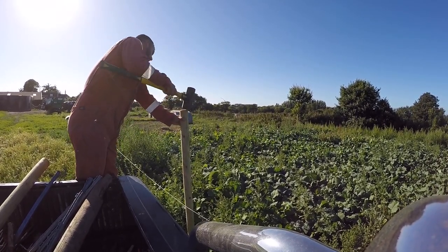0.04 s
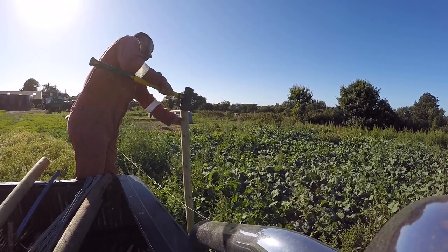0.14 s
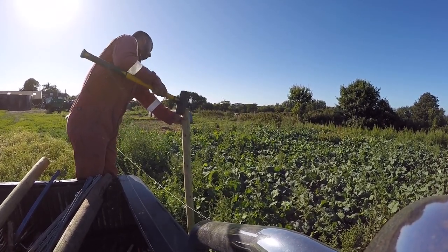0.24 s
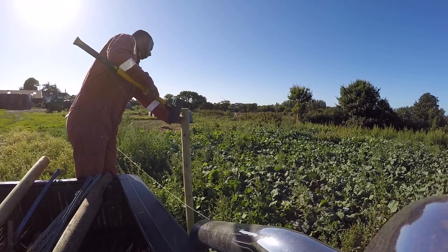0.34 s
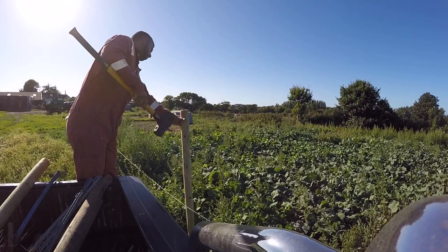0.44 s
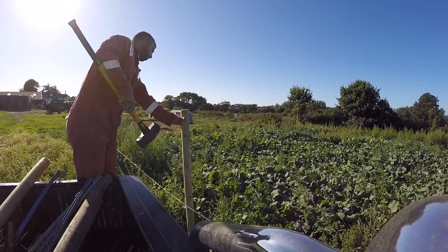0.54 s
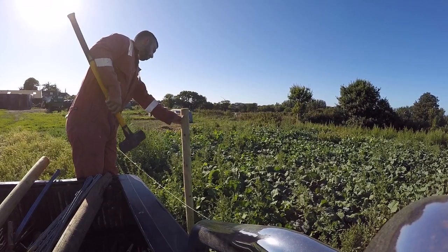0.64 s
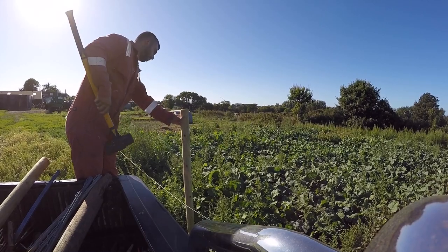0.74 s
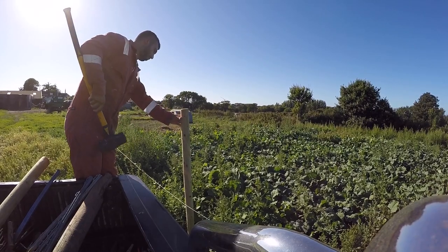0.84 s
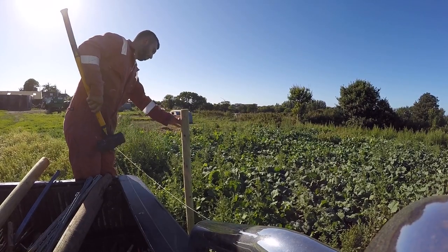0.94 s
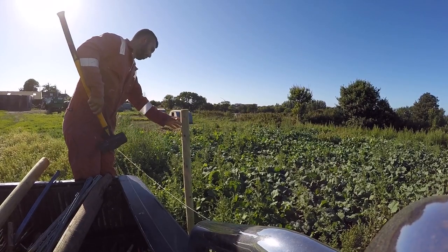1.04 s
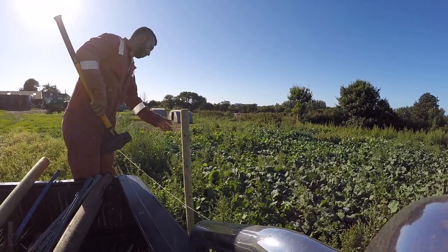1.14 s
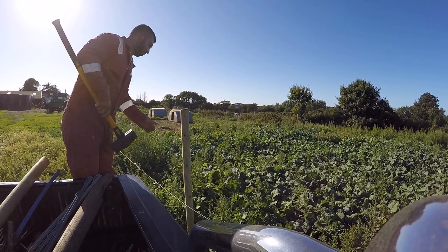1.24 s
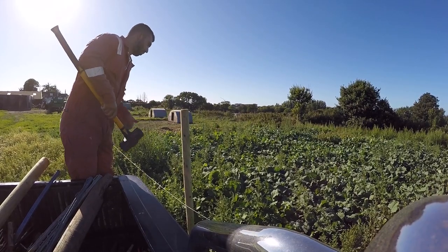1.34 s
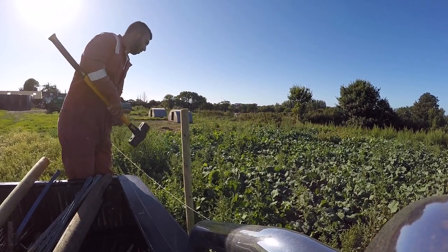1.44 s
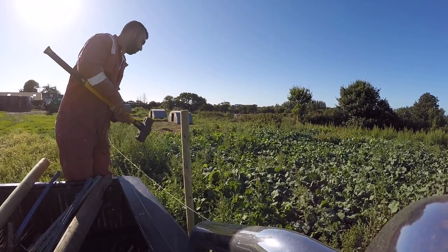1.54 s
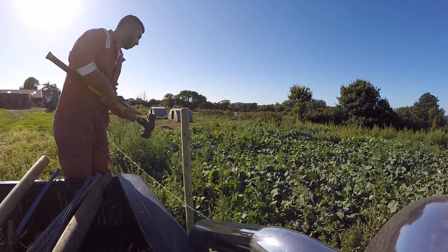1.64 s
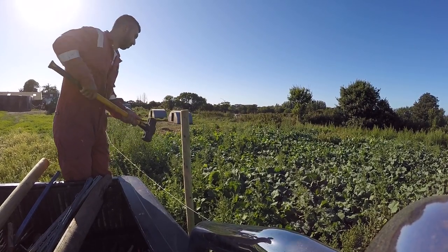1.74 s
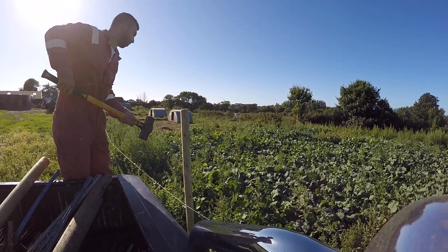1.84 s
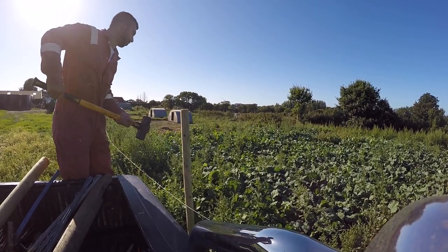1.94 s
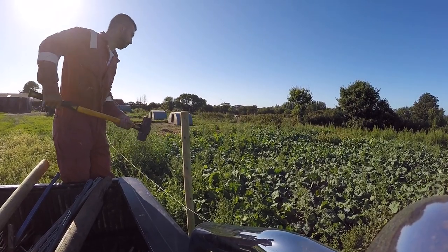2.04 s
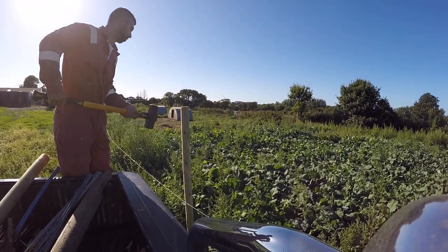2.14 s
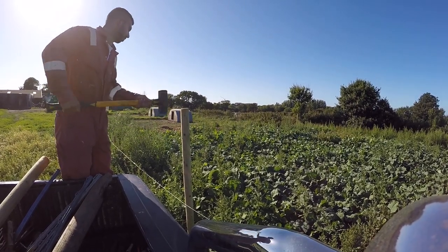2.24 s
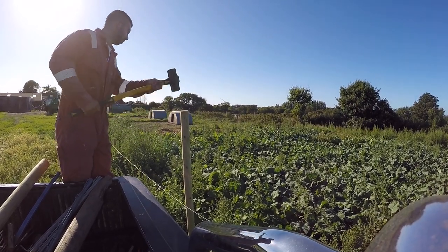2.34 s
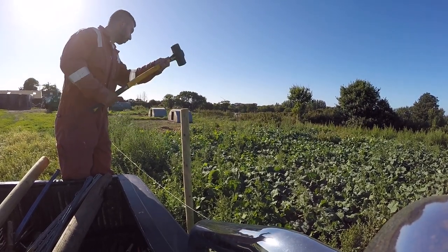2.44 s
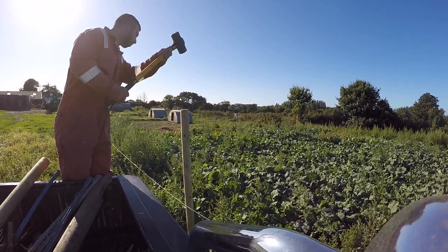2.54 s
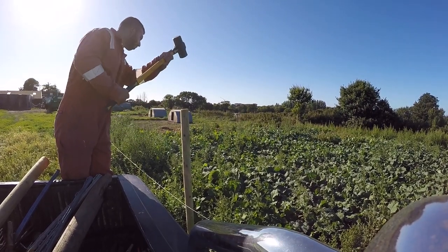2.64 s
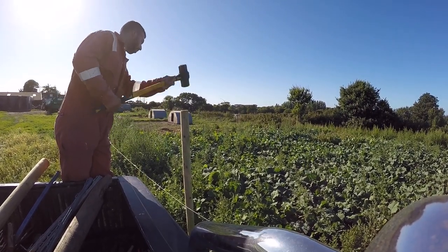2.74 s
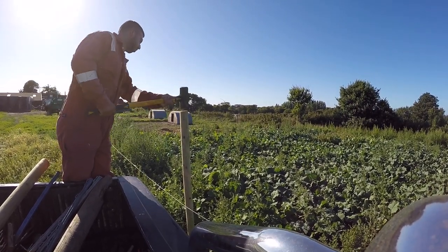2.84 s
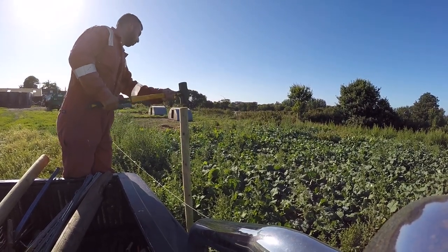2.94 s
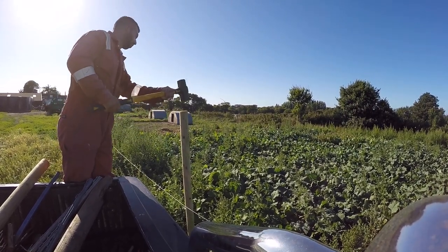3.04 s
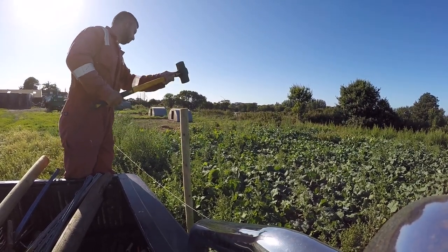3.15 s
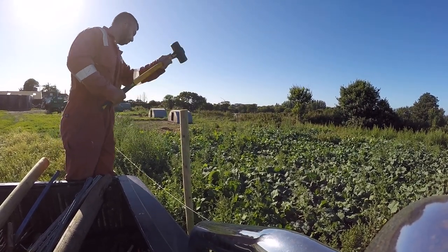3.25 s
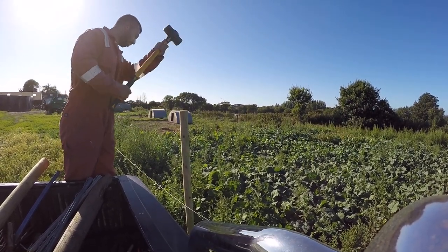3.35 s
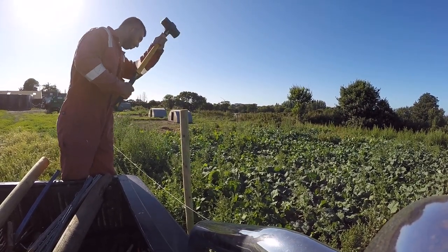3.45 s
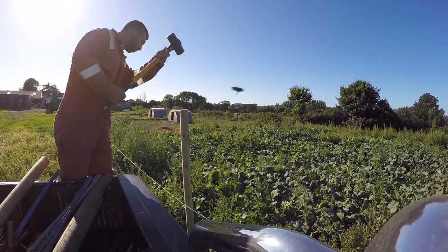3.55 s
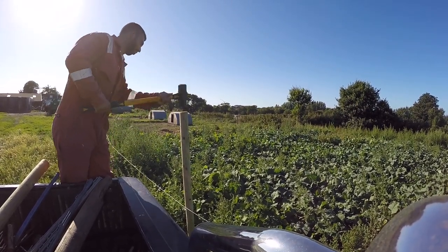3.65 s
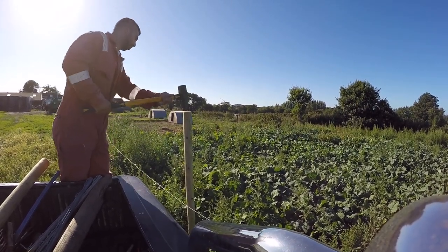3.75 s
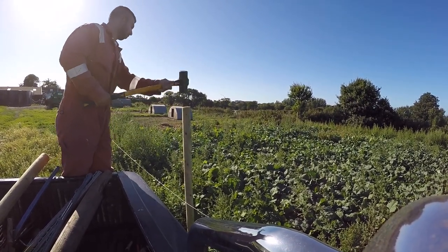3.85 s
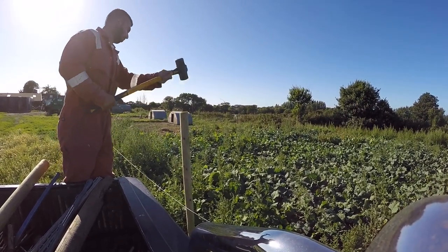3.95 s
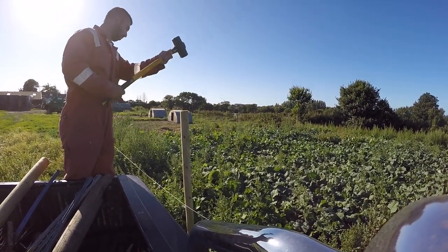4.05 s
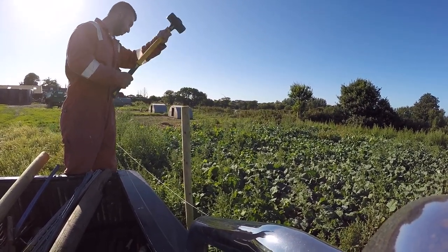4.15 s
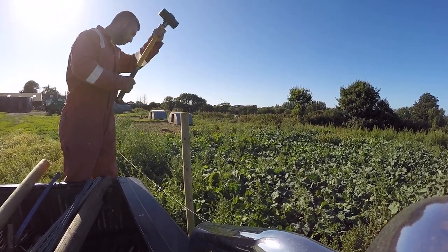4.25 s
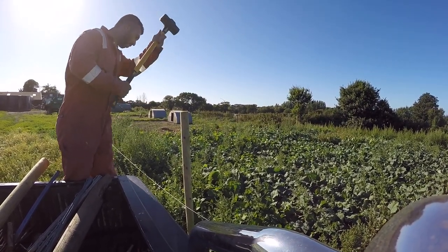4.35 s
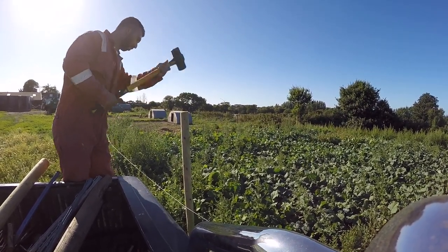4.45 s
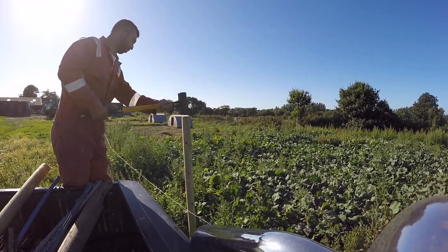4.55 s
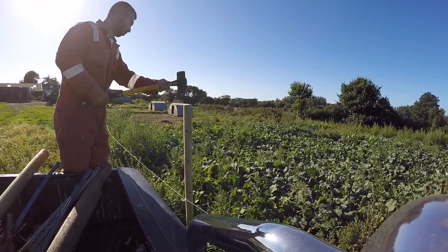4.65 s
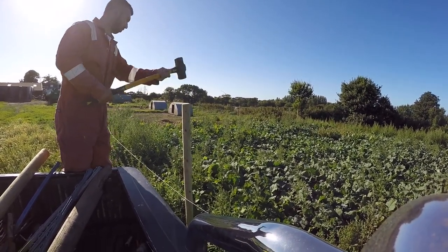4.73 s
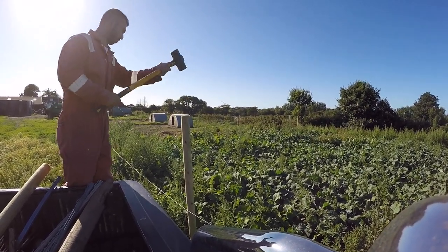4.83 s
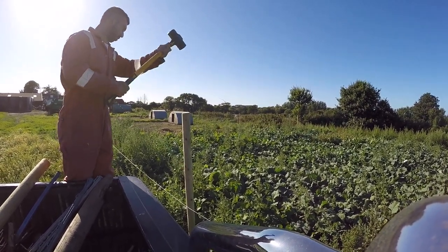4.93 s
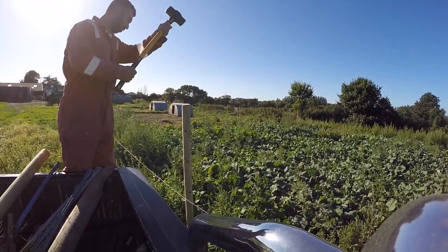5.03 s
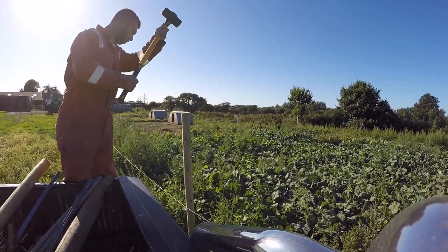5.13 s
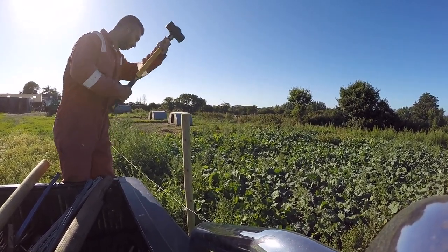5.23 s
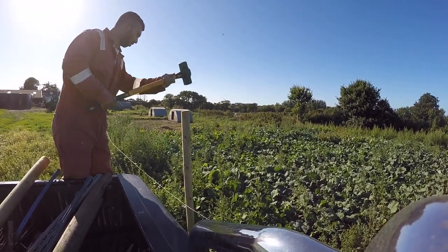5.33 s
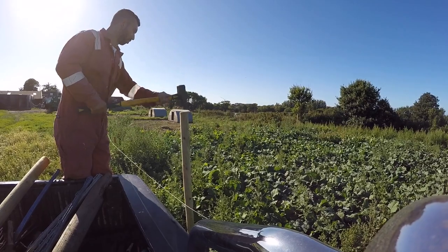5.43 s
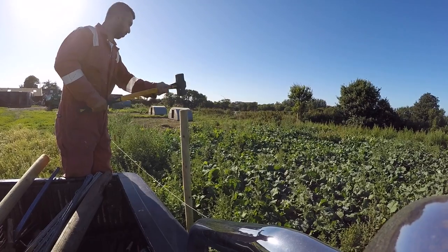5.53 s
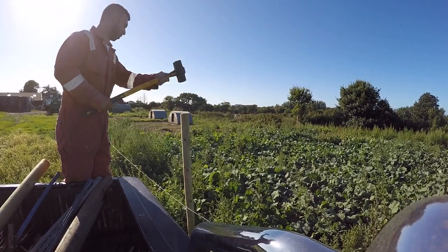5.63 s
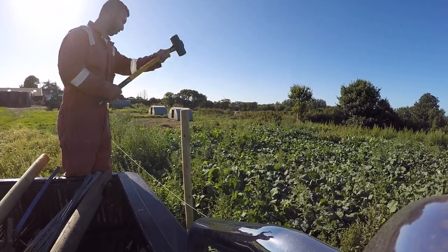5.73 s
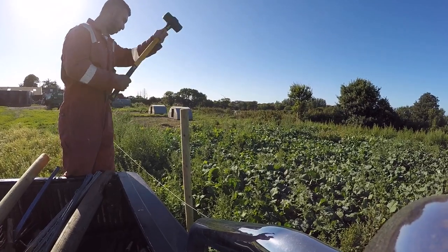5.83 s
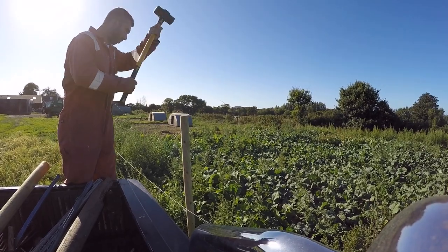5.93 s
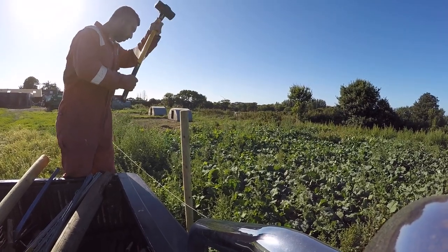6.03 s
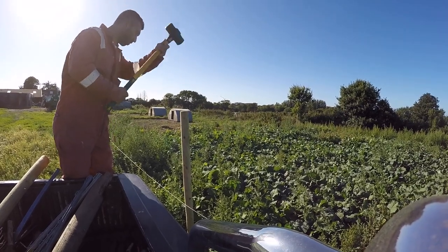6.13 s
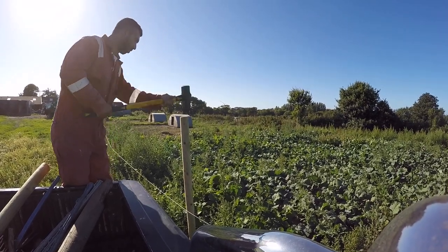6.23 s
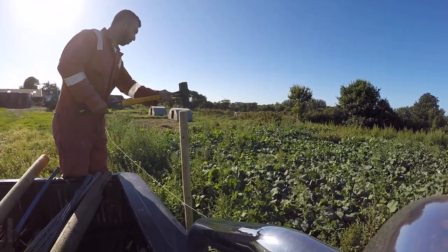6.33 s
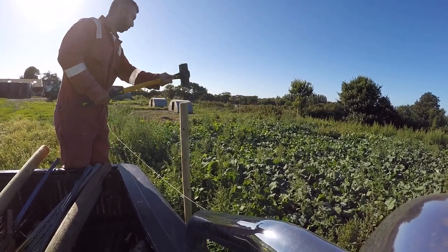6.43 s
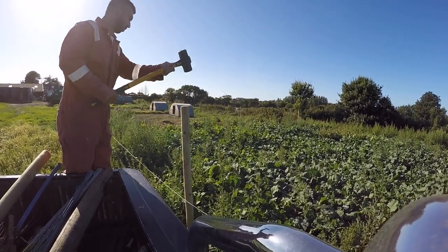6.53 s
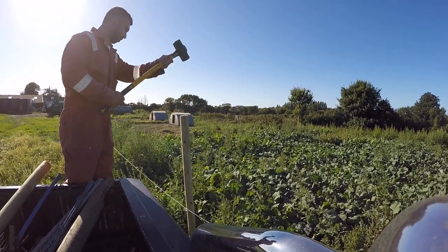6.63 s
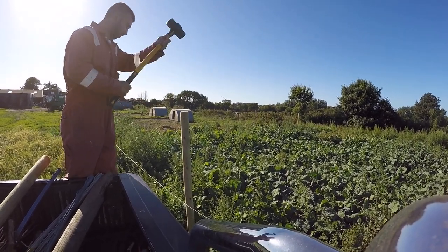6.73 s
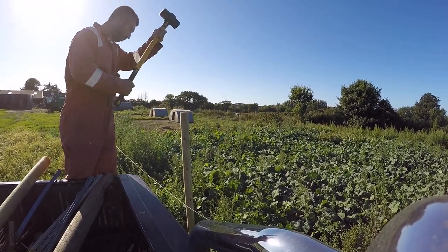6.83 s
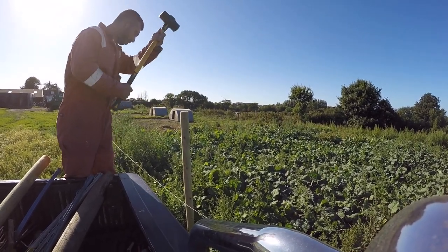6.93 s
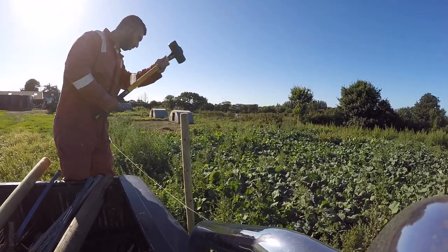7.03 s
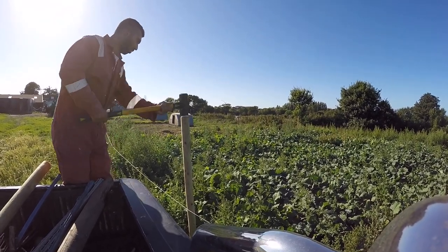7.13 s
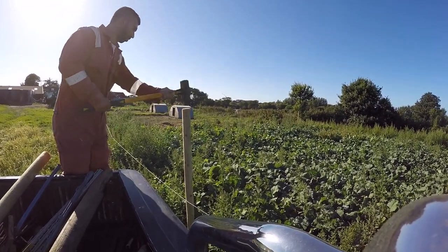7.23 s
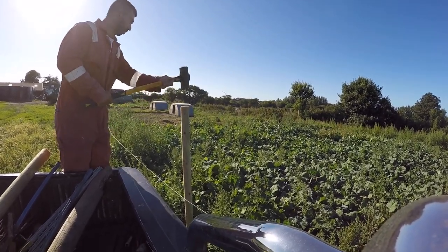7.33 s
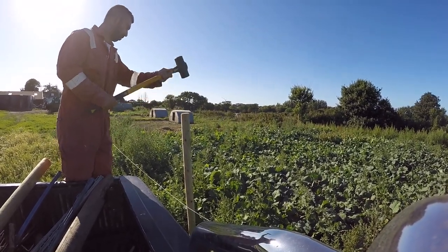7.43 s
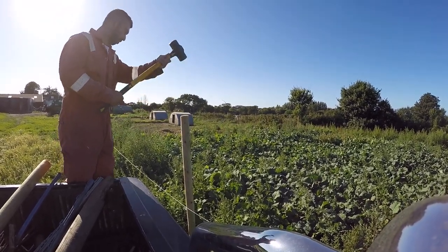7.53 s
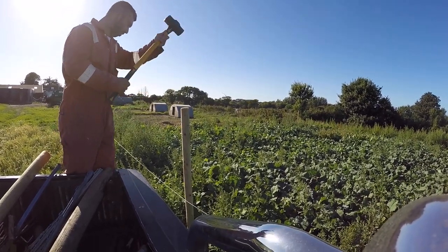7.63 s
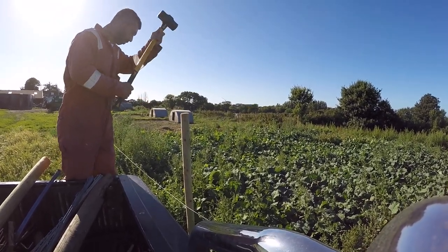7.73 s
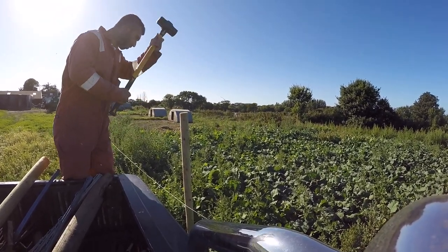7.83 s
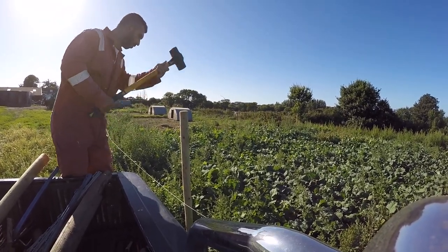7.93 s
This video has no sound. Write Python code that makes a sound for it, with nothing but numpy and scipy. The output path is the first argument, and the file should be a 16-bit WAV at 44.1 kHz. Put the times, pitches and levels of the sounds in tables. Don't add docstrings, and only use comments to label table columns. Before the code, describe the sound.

Outdoors in a field, close to a small camera microphone, the tail of one blow fades into a low generator drone with wind puffs and faint birds. A glove rubs along the handle, then a sledgehammer hits a wooden post six times, just under a second apart, each a loud dry crack with a low soil thump and a faint slap from a far shed. A loose rattle knocks near the end.

```python
import sys
import numpy as np
from scipy import signal
from scipy.fft import rfft, irfft
from scipy.io import wavfile
from scipy.ndimage import uniform_filter1d, minimum_filter1d

SR = 44100
rng = np.random.default_rng(int(sys.argv[2]) if len(sys.argv) > 2 else 0)


def dump(signal):
    limited = np.clip(np.atleast_2d(signal).T, -1, 1)
    pcm = np.round(limited * 32767).astype(np.int16)
    wavfile.write(sys.argv[1], SR, pcm)


def level_to_linear(level):
    exponent = np.asarray(level, float) / 20
    return 10 ** exponent


N = 351914

# (frequency [Hz], level [dB])
SPLINTER = [(150, -16.5), (380, -9), (530, -21), (777, -12.5), (1300, -7.5), (1980, -13), (5230, -22),
            (11500, -39.5), (16000, -58)]


def evened(x):
    return x / np.sqrt(np.mean(x ** 2) + 1e-20)


def smooth_noise(count, size):
    return evened(uniform_filter1d(rng.standard_normal(count), size))


def read(points, hz):
    f, value = np.transpose(points)
    return np.interp(np.log(hz + 1), np.log(f + 1), value)


def add(mix, s, sound):
    start = round(s * SR)
    sound = sound[max(-start, 0):]
    part = mix[max(start, 0):][:len(sound)]
    part += sound[:len(part)]


def coloured(count, points):
    hz = np.fft.rfftfreq(count, 1 / SR)
    spectrum = rfft(rng.standard_normal(count)) * level_to_linear(read(points, hz))
    return evened(irfft(spectrum, count))


def follow(table):
    s, db = np.transpose(table)
    return level_to_linear(np.interp(np.arange(N) / SR, s, db))


def scattered(t, colour, stretch):
    # (frequency [Hz], t60 [s])
    scatter_t60 = [(250, 0.11), (660, 0.056), (1000, 0.054), (1740, 0.058), (4590, 0.049), (13000, 0.04)]
    hz, frame, z = signal.stft(coloured(len(t), colour), SR, nperseg=128, noverlap=96)
    z = z * level_to_linear(-60 * frame / (stretch * read(scatter_t60, hz)[:, None]))
    return signal.istft(z, SR, nperseg=128, noverlap=96)[1][:len(t)]


def rings(modes, t, db, scatter):
    start = rng.random(len(modes))
    detune, uneven = scatter * rng.standard_normal((2, len(modes)))
    out = np.zeros(len(t))
    for (hz, mode_db, t60), phase, d, v in zip(modes, start, detune, uneven):
        decay = level_to_linear(db + mode_db + 1.1 * v - 60 * t / t60)
        out += decay * np.sin(2 * np.pi * (hz * (1 + .03 * d) * t + phase))
    return out


def post_modes(struck, t):
    # (frequency [Hz], t60 [s])
    wood_t60 = [(250, 0.036), (700, 0.039), (1100, 0.037), (2000, .031), (2900, 0.035), (3500, 0.019)]
    out = np.zeros(len(t))
    for hz, db in struck:
        rise = np.minimum(t * hz / .9, 1) ** 2
        twin = level_to_linear(-9.5) * np.sin(2 * np.pi * hz * 1.055 * t)
        out += level_to_linear(db - 60 * t / read(wood_t60, hz)) * rise * (np.sin(2 * np.pi * hz * t) + twin)
    return out


def crack(t, peak_db, edge_db, struck):
    # (frequency [Hz], level [dB], t60 [s])
    post_high = [(2400, -22, 0.022), (3150, -17.5, 0.022), (3560, -18.5, 0.052)]
    # (frequency [Hz], level [dB], t60 [s])
    steel = [(4100, -21, .022), (4600, -21, .022), (5170, -8, .022), (5900, -17, .022), (6450, -18, .022),
             (7900, -21, .018)]
    # (frequency [Hz], level [dB])
    tick_colour = [(1500, -21.5), (4000, -2.5), (5400, 3.5), (7500, -10.5), (12000, -14), (16000, -27)]
    chatter = level_to_linear(1.7 * smooth_noise(len(t), 60))
    post = post_modes(struck, t) + rings(post_high, t, .1, 1.0)
    ringing = (post + rings(steel, t, edge_db, 0.69)) * chatter
    fibres = level_to_linear(-7.0 + .5 * edge_db) * scattered(t, SPLINTER, 0.94)
    contact = np.exp(-((t - .0019) / 0.00058) ** 2)
    tick = level_to_linear(-9.5 + edge_db) * coloured(len(t), tick_colour) * contact
    onset = np.minimum(t / 0.0016, 1) ** 0.97
    return level_to_linear(peak_db + 1.5) * (ringing + fibres + tick) * onset, fibres


def thump(t):
    late = np.maximum(t - .0088, 0)
    decay = np.exp(-(late / 0.023) ** 1.4) * (1 - .4 * np.exp(-late / 0.0051))
    soil = np.sin(2 * np.pi * 82 * late * (1 - 5.1 * late)) * decay
    push = -level_to_linear(-6.0) * np.sin(2 * np.pi * 150 * t) * level_to_linear(-60 * t / 0.08)
    return soil + push


def shed_echo(t, sound, peak_db):
    # (delay [s], level [dB])
    walls = [
        (0.075, -44.5),
        (.083, -55.5),
        (0.093, -56),
        (.113, -54),
        (.122, -61),
    ]
    smear = rng.standard_normal(2500) * level_to_linear(-25 - 60 * t[:2500] / .03)
    smear[0] = 1
    back = signal.fftconvolve(sound, smear / np.linalg.norm(smear))
    back = uniform_filter1d(back, size=5)
    echo = np.zeros(len(t))
    for delay, db in walls:
        add(echo, delay, level_to_linear(db) * back)
    return echo + level_to_linear(peak_db - 29.5) * scattered(t, SPLINTER, 2.4) * np.minimum(t / 0.02, 1)


def shed_haze(t, haze_db):
    # (frequency [Hz], level [dB])
    shed = [(300, -13.5), (1000, -6), (2500, -8.5), (4200, -9), (5000, 1.5), (6200, -3.5), (7200, -9.5),
            (14000, -24)]
    swell = np.minimum(t / 0.016, 1) * level_to_linear(-60 * t / 0.24)
    swell += level_to_linear(-18 - 60 * (t - .076) / 0.17) * (t > .076)
    swell += level_to_linear(-27.5 - 60 * (t - .113) / 0.41) * (t > .113)
    flutter_db = 2.2 * smooth_noise(len(t), 200)
    return coloured(len(t), shed) * level_to_linear(-38.0 + haze_db + flutter_db) * swell


def hammering():
    landed = [
        -.053,
        2.9318,
        3.7914,
        4.6503,
        5.5063,
        6.381,
        7.2533,
    ]
    # (peak [dB], steel edge [dB], soil thump [dB], far haze [dB])
    blows = [
        (3, 3, -34, -1.5),
        (3.5, 0, -7, -3),
        (5, -1, -3.5, -2.5),
        (3.5, 2.5, -3, -3),
        (5.5, 3.5, -0.5, 1),
        (1.5, 10.5, -1, 3.5),
        (4.5, 1.5, 0.5, -3.5),
    ]
    # (frequency [Hz], level [dB])
    struck_modes = [
        [(330, -14), (685, -6), (1010, -8), (1290, -7), (1530, -10), (1995, -11)],
        [(328, -9), (441, -15.5), (640, -16.5), (1022, -5.5), (1281, -6.5), (1518, -9.5), (1695, -5),
         (2018, -14), (2185, -11.5), (2632, -9.5)],
        [(322, -8), (764, -13.5), (920, -7), (1281, -0.5), (1523, -7.5), (1846, -6.5), (1981, -2), (2201, -14),
         (2637, -7), (2863, -10)],
        [(250, -8), (495, -13.5), (925, -7), (1103, -5), (1281, 1.5), (1512, -2), (2002, -2.5), (2632, -9),
         (2863, -12.5), (3270, -13.5)],
        [(330, -3), (409, -4.5), (710, -5), (1017, -1.5), (1302, -14), (1539, -13), (1846, -5.5), (2239, -13),
         (2761, -5)],
        [(322, -9.5), (672, -4), (1000, 3), (1178, -9.5), (1310, -19), (1785, -9.5), (2271, -15.5),
         (2551, -13.5), (2772, -13), (3480, -14.5)],
        [(250, -3.5), (400, -9), (683, -3), (979, -3.5), (1270, 3.5), (1512, -3), (1790, -9), (1995, -2),
         (2230, -11.5), (2621, -10), (2912, -13.5), (3400, -18.5)],
    ]
    out = np.zeros(N)
    t = np.arange(SR // 3) / SR
    for s, (peak_db, edge_db, thump_db, haze_db), struck in zip(landed, blows, struck_modes):
        direct, fibres = crack(t, peak_db, edge_db, struck)
        echo = shed_echo(t, direct + level_to_linear(peak_db + 5.5) * fibres, peak_db)
        add(out, s, direct + level_to_linear(thump_db) * thump(t) + echo + shed_haze(t, haze_db))
    return out


def generator():
    # (multiple of the firing rate, level [dB])
    standing_out = [(1, 2), (2, -2), (3, -7.5), (3.25, -15), (4, -3.5), (6, -29), (6.75, -25), (7.5, -25),
                    (7.75, -17.5), (8, -12.5), (8.25, -26), (8.75, -28), (20, -29), (9.75, -25)]
    pump_db = [-7, -15.5, -30.5, -31]
    firing_hz, pump_hz = 25.03, 69.3
    drift = evened(uniform_filter1d(smooth_noise(N, 30000), size=30000))
    t = np.cumsum(1 + .0006 * drift) / SR
    comb = {k: -20 - 0.9253 * k for k in range(1, 22)} | dict(standing_out)
    out = sum(level_to_linear(db) * np.cos(2 * np.pi * (k + 1) * pump_hz * t) for k, db in enumerate(pump_db))
    for k, db in comb.items():
        slow = uniform_filter1d(rng.standard_normal(N // 500 + 1), 12)
        waver = evened(np.repeat(slow, 500)[:N])
        lag = 0.027 * k ** 2 + 0.09 * k * uniform_filter1d(waver, 1000)
        strength = level_to_linear(db + 2.0 * uniform_filter1d(waver[::-1], 1000))
        out += strength * np.cos(2 * np.pi * k * (firing_hz * t + .3) - lag)
    return level_to_linear(-34.5) * np.sqrt(2) * out


def field():
    # (frequency [Hz], level [dB])
    wash_colour = [(35, -30), (60, 0), (108, -8), (149, -16.5), (207, -11.5), (323, -25), (540, -24.5),
                   (903, -31), (1250, -34), (2250, -45), (3120, -46), (11500, -63), (14700, -65.5),
                   (15500, -100)]
    # (time [s], level change [dB])
    breeze = [
        (0, 1.5),
        (3.3, 3),
        (3.75, 1.5),
        (4.2, 2.5),
        (4.9, -0.5),
        (5.45, 2),
        (7.1, 2),
        (7.4, -4.5),
        (7.98, 2),
    ]
    frames, hz = N // 256 + 5, np.fft.rfftfreq(1024, 1 / SR)
    a, b, patches = rng.standard_normal((frames, 513, 3)).T
    patches = evened(uniform_filter1d(uniform_filter1d(patches, 14, 0), 14, 1))
    level_db = read(wash_colour, hz)[:, None] + 0.2 * patches
    spectra = (a + 1j * b) * level_to_linear(level_db) * (hz > 100)[:, None]
    wash = signal.istft(spectra, nperseg=1024, noverlap=768)[1][:N]
    return level_to_linear(-47 + 1.5) * evened(wash) * follow(breeze)


def gusts():
    # (time [s], level [dB])
    steady_air = [
        (0, -45),
        (1, -40),
        (2, -29.5),
        (2.6, -29),
        (3.5, -28.5),
        (3.9, -35.5),
        (5.5, -30),
        (7, -34.5),
        (7.45, -54),
        (7.98, -34),
    ]
    # (peak time [s], length [s], level [dB])
    puff_rows = [(0.015, 0.097, -31.5), (0.213, 0.11, -30.5), (0.365, 0.09, -27.5), (0.55, 0.18, -27.5),
                 (1.207, 0.062, -32), (1.504, 0.056, -47), (2.794, 0.12, -31), (3.012, 0.13, -25),
                 (3.176, 0.13, -23.5), (3.31, 0.11, -18), (3.644, 0.092, -24), (4.248, 0.11, -23),
                 (4.48, 0.13, -21), (4.663, 0.17, -17), (4.868, 0.053, -25), (5.085, 0.06, -30.5),
                 (5.299, 0.076, -31.5), (5.581, 0.13, -20), (5.86, 0.064, -22), (6.034, .14, -21),
                 (6.385, 0.22, -24), (6.683, 0.074, -20.5), (6.806, 0.06, -17), (7.066, 0.11, -32),
                 (7.26, 0.074, -28.5), (7.693, 0.056, -32), (7.94, 0.12, -24.5)]
    t = np.arange(0, N + 64, 64) / SR
    puffs = sum(level_to_linear(db) * np.exp(-(2 * (t - s) / length) ** 2) for s, length, db in puff_rows)
    return follow(steady_air) + np.interp(np.arange(N) / SR, t, puffs)


def wind():
    # (frequency [Hz], level [dB])
    gust_colour = [(15, -1.5), (30, 2.5), (60, 4), (110, -12), (200, -22.5), (400, -38), (800, -74.5)]
    # (time [s], peak [dB], frequency [Hz], swings, push +1 or pull -1)
    buffets = [(0.106, -20, 191, 0.7, 0.82), (0.1106, -37, 200, 0.5, -0.68), (2.401, -12, 110, 0.52, -0.6),
               (2.839, -20.5, 148, 1.5, 0.86), (3.234, -10.5, 131, 0.67, 0.83), (3.284, -11, 70, 0.7, 0.72),
               (3.3015, -14, 129, 0.53, 1), (3.327, -16.5, 90, 0.79, 0.99), (3.355, -14.5, 106, 1.8, 0.89),
               (3.379, -20, 172, 0.84, 0.92), (4.531, -13, 80, 1.4, 0.98), (4.56, -23, 170, 1.5, -1.05),
               (5.244, -25, 169, 1, 0.97), (7.589, -27.5, 238, 2.4, 0.98), (7.606, -25.5, 253, 4.6, 0.63),
               (7.637, -24.5, 219, 2.4, -0.71), (7.664, -39, 228, 1.6, 0.89), (7.69, -32, 250, 1.5, 1)]
    lumps = smooth_noise(N, 1800)
    out = coloured(N, gust_colour) * level_to_linear(1.2 * uniform_filter1d(lumps, 600) - 2.0) * gusts()
    t = np.arange(-1764, 1764) / SR
    for s, peak_db, hz, swings, way in buffets:
        bell = np.exp(-(2 * hz * t / swings) ** 2)
        add(out, s + t[0], way * level_to_linear(peak_db) * np.cos(2 * np.pi * hz * t) * bell)
    return out


def knock(peak_db, hz, t60, body_db):
    t = np.arange(5000) / SR
    edge = coloured(len(t), [(hz * 0.14, -15), (hz, 0), (hz * 1.2, -8), (hz * 2.0, -17), (20000, -56)])
    body = coloured(len(t), [(80, -34), (250, 4.0), (700, 14), (1600, 1), (5000, -54)])
    burst = edge * level_to_linear(-60 * t / max(t60, .005))
    burst += body * level_to_linear(body_db - 60 * t / max(1.86 * t60, .005))
    burst *= level_to_linear(1.2 * smooth_noise(len(t), 90))
    return level_to_linear(peak_db - 4) * burst * np.minimum(t / .0005, 1)


def rattle():
    # (time [s], peak [dB], centre [Hz], t60 [s],
    # dull body [dB])
    knocks = [(0.064, -51, 5000, 0.072, -12), (.097, -41, 2500, 0.026, 2.5), (.204, -52, 5000, .03, -17),
              (.16, -57, 5500, .06, -18), (0.023, -41, 1800, .06, -14), (.03, -45, 4500, .05, -10),
              (0.296, -47, 2500, 0.13, -8), (1.087, -40, 900, 0.022, 0), (1.567, -45, 900, .03, -2),
              (4.124, -45, 1500, .03, 2), (5.852, -45.5, 3000, 0.031, 4.5), (6.728, -50, 4500, 0.06, 4.5),
              (6.752, -49, 3900, .02, -20), (.24, -58, 3000, .2, -12), (7.574, -41, 1190, 0.055, -4),
              (7.582, -33, 1800, 0.11, -1.5), (7.597, -36.5, 1505, 0.099, -1),
              (7.611, -35, 5300, 0.037, -4), (7.6137, -26.5, 4130, 0.021, -20),
              (7.627, -36.5, 1640, 0.23, -5), (7.6465, -17.5, 850, 0.019, -8),
              (7.619, -48, 6000, 0.045, -20), (7.621, -36.5, 1200, 0.044, -2), (7.652, -28, 900, 0.044, -5),
              (7.631, -40, 1600, .02, -20), (7.662, -31, 700, 0.051, -2), (7.676, -38, 3500, 0.03, -15),
              (7.693, -57, 6200, .06, -14), (7.713, -55, 5000, .04, -14), (7.711, -42.5, 1500, 0.056, 3.5),
              (7.86, -48.5, 3500, 0.025, -7.5), (7.582, -45, 7000, .03, -18), (7.592, -54, 8000, .02, -20),
              (7.64, -56, 8000, .015, -20), (7.646, -46, 5000, .03, -20), (7.84, -58, 4480, .015, -20),
              (7.877, -52, 8460, 0.013, -20), (7.898, -60, 7970, 0.014, -20),
              (7.917, -51.5, 6000, .012, -20), (7.936, -57, 6500, .012, -20), (7.954, -53, 7930, .015, -20)]
    out = np.zeros(N)
    for s, *row in knocks:
        add(out, s, knock(*row))
    return out


def bird(length, from_hz, to_hz, db, fuzz_hz, bend):
    count = round(length * SR)
    jitter = smooth_noise(count, 40)
    hz = from_hz + (to_hz - from_hz) * np.linspace(0, 1, count) ** bend + fuzz_hz * jitter
    note = level_to_linear(db) * np.sqrt(2) * np.sin(2 * np.pi * np.cumsum(hz) / SR)
    note *= signal.windows.tukey(count, .6)
    note *= level_to_linear(.9 * evened(uniform_filter1d(jitter[::-1], size=350)))
    hedge = rng.standard_normal(3000) * level_to_linear(-60 * np.arange(3000) / SR / .09)
    hedge *= level_to_linear(-6.5) / np.linalg.norm(hedge)
    hedge[0] = 1
    return signal.fftconvolve(note, hedge)


def birds():
    # (time [s], frequency [Hz], level [dB])
    chips = [
        (.185, 5300, -65),
        (3.518, 4430, -61),
        (4.058, 5970, -70),
        (4.174, 3110, -58),
        (4.195, 6000, -70),
        (4.33, 6050, -66.5),
        (4.472, 5900, -64),
        (7.91, 4250, -68.5),
        (7.947, 4260, -68),
    ]
    # (time [s], start [Hz], glide [Hz], level [dB])
    flicks = [(.262, 3300, 900, -68), (.262, 4500, 900, -72), (.383, 3400, 700, -67),
              (.376, 4400, 900, -70), (1.4, 4500, 1000, -67), (3.286, 3550, 900, -65),
              (3.526, 4300, 900, -66), (3.103, 3400, 750, -71), (4.443, 4050, 964, -67),
              (4.495, 4800, 600, -68), (4.897, 5100, 900, -69), (5.075, 3950, 355, -74),
              (5.148, 3660, 401, -70), (5.258, 4170, 150, -68), (5.988, 4000, 700, -62),
              (6.215, 4270, 900, -61.5), (6.347, 4570, 1246, -65.5), (6.793, 4620, 1400, -64),
              (7.507, 4180, 549, -67.5), (7.749, 3130, 500, -67.5), (7.848, 4300, 1300, -66),
              (7.888, 4830, 500, -60), (7.89, 3700, 500, -65), (7.82, 3950, 300, -70),
              (5.365, 4700, 500, -73), (6.14, 4300, 703, -68), (6.318, 4290, 997, -66)]
    # (time [s], length [s], start [Hz], end [Hz], level [dB])
    scolds = [
        (0.328, 0.046, 2800, 2220, -58),
        (2.295, 0.12, 4230, 4360, -66),
        (2.296, 0.06, 4580, 4650, -66),
        (2.326, 0.034, 3150, 3560, -59),
        (2.344, 0.037, 3550, 2980, -51),
        (2.358, 0.054, 2990, 2310, -55.5),
        (2.342, 0.035, 2850, 3180, -59),
        (5.036, .04, 2900, 2150, -63.5),
        (6.775, 0.036, 2650, 2400, -63.5),
    ]
    # (time [s], length [s], start
    # [Hz], end [Hz], level [dB])
    whistles = [(1.49, .045, 3600, 5000, -68), (2.272, .022, 3500, 3620, -66),
                (2.64, 0.14, 1880, 2040, -65), (2.837, .065, 2000, 2250, -67),
                (3.108, 0.075, 2780, 2520, -65), (3.165, 0.15, 2540, 2210, -60),
                (3.435, 0.06, 1880, 2050, -64), (3.503, 0.033, 2070, 2030, -59),
                (4.075, 0.043, 2450, 2390, -60.5), (4.1, 0.047, 2390, 2540, -60),
                (4.345, 0.04, 3150, 3070, -66), (4.958, 0.05, 2330, 2300, -67.5),
                (5.17, 0.14, 2250, 2340, -67), (6.559, .016, 3580, 4000, -58),
                (6.564, 0.014, 4310, 4760, -61), (3.975, .016, 1880, 1930, -64)]
    # (time [s], length [s], start [Hz], end [Hz], level [dB])
    trills = [
        (5.257, 0.11, 5520, 4700, -70.5),
        (5.301, 0.077, 4740, 3970, -65),
        (5.357, 0.053, 4220, 3100, -68),
        (5.688, 0.04, 5400, 5200, -67),
        (5.895, 0.033, 2510, 2180, -59),
        (5.932, 0.18, 2500, 2410, -66.5),
        (2.298, 0.045, 2800, 2550, -69),
    ]
    # (time [s], frequency [Hz], level [dB])
    buzzes = [(4.17, 4200, -68), (4.208, 3700, -71), (4.278, 4000, -70), (4.306, 4100, -69),
              (4.32, 4000, -68), (4.34, 3980, -68), (4.358, 4200, -70), (4.393, 3900, -64),
              (4.884, 4920, -67), (4.997, 2820, -65), (4.997, 3800, -69), (5.238, 3900, -68)]
    # (time [s], length [s], start [Hz], end [Hz], level [dB], fuzz [Hz], bend)
    notes = [(s, .018, hz, hz * .95, db, 60, 1.05) for s, hz, db in chips]
    notes += [(s, .025, hz, hz + glide, db - .5, 70, 1.35) for s, hz, glide, db in flicks]
    notes += [(*row, 110, 1.3) for row in scolds]
    notes += [(*row, 25, 1.05) for row in whistles]
    notes += [(*row, 320, 1.3) for row in trills]
    notes += [(s, .01, hz, hz * 1.15, db, 320, 1.35) for s, hz, db in buzzes]
    out = np.zeros(N)
    for s, *row in notes:
        add(out, s, bird(*row))
    return out


def slide():
    # (time [s], length [s], level [dB], fade over the stroke [dB])
    strokes = [
        (1.638, 0.1, -55, -1),
        (1.686, .13, -54.5, -2),
        (1.758, 0.2, -57.5, 4.5),
        (1.87, 0.19, -57.5, -4),
        (2.5, 0.29, -72, 5),
    ]
    # (frequency [Hz], level [dB])
    cloth = [(1000, 3), (2500, -3.5), (5000, -5.5), (9000, -7), (15000, -10)]
    out = np.zeros(N)
    for s, length, db, fade_db in strokes:
        count = round(length * SR)
        grain = level_to_linear(1.2 * smooth_noise(count, 150))
        stroke = level_to_linear(db + fade_db * np.arange(count) / count) * signal.windows.hann(count)
        add(out, s, coloured(count, cloth) * grain * stroke)
    return out


def scene():
    mix = hammering() + generator() + field() + wind() + rattle() + birds() + slide()
    return mix[None]


def limited(x, ceiling, share):
    peak = -minimum_filter1d(-abs(x), size=97)
    gain = np.minimum(ceiling / (peak + 1e-9), 1) ** share
    return x * uniform_filter1d(gain, size=48)


def roll_off(x):
    return signal.sosfilt(signal.butter(12, 16530, fs=SR, output="sos"), x)


def record(dry):
    held = limited(dry, 1, .35)
    clipped = held / (1 + abs(held / .95) ** 6) ** (1 / 6)
    power = abs(uniform_filter1d(clipped[0] ** 2, 1300, origin=600))
    power_db = 10 * np.log10(power + 1e-12)
    fall = np.arange(N) * 16.0 / SR
    over_db = np.maximum(np.maximum.accumulate(power_db + fall) - fall + 15.5, 0)
    ducked = clipped / level_to_linear(0.38 * uniform_filter1d(over_db, 1500, origin=700))
    ducked = signal.sosfilt(signal.cheby2(10, 60, 16400, fs=SR, output="sos"), ducked)
    ducked = limited(ducked, .96, 1)
    top = signal.sosfiltfilt(signal.butter(12, 12800, "high", fs=SR, output="sos"), ducked)
    quiet = uniform_filter1d(abs(top), size=4096) < level_to_linear(-84)
    starved = uniform_filter1d(rng.standard_normal(N), size=6000) > 0
    mix = ducked - top * uniform_filter1d(1. * (quiet & starved), size=512)
    return roll_off(mix)


dry = scene()
out = record(dry)
dump(out)
```